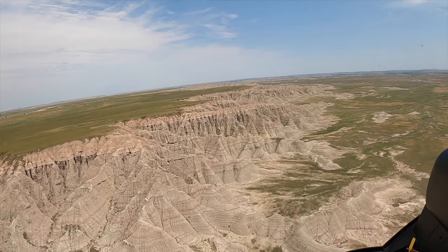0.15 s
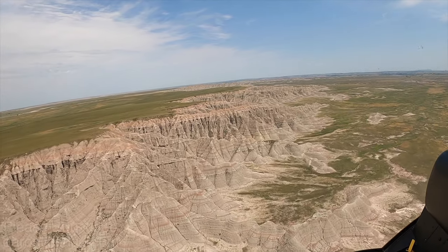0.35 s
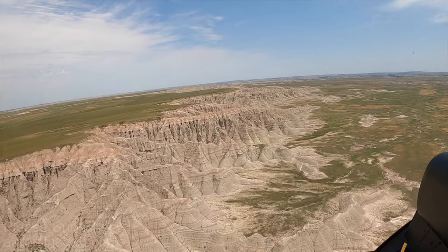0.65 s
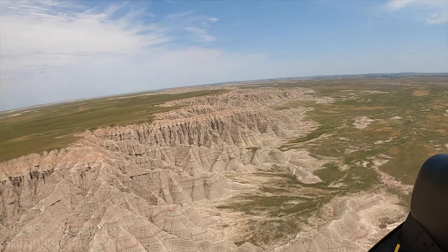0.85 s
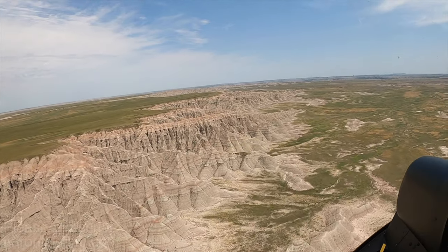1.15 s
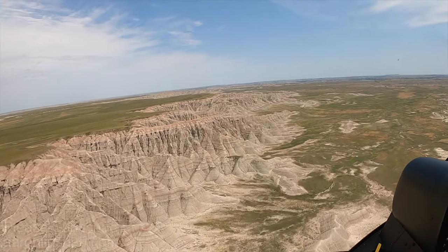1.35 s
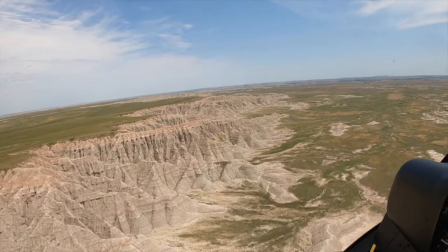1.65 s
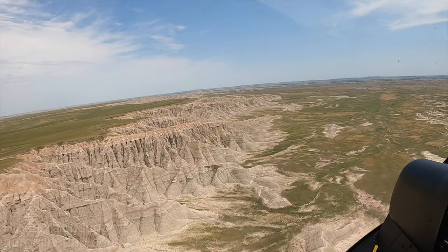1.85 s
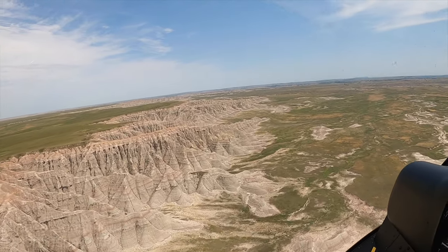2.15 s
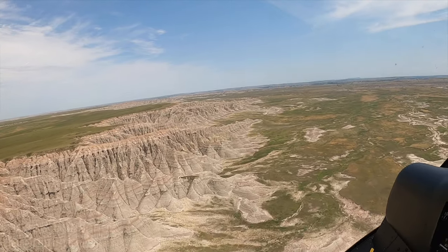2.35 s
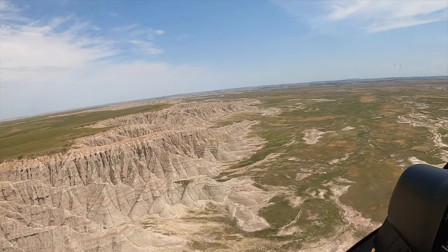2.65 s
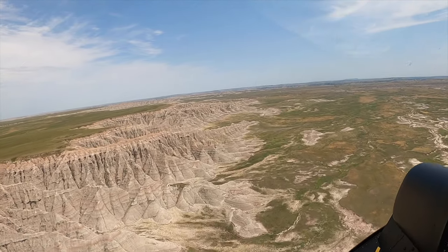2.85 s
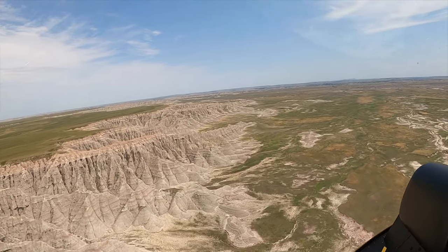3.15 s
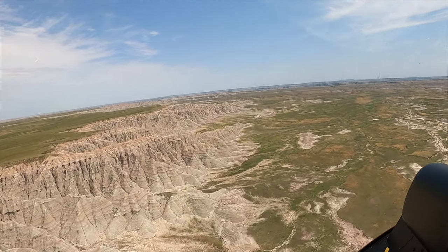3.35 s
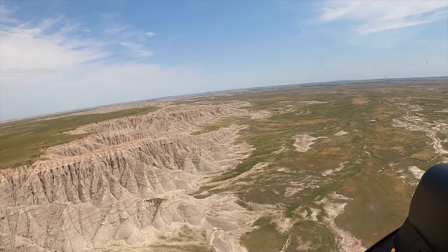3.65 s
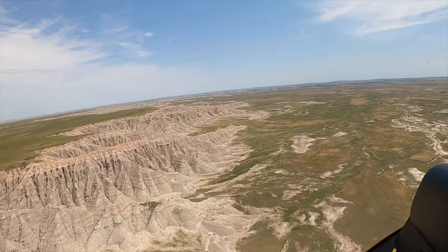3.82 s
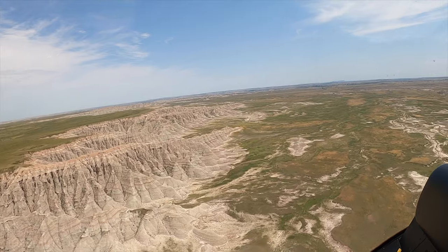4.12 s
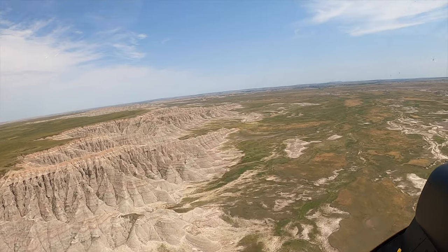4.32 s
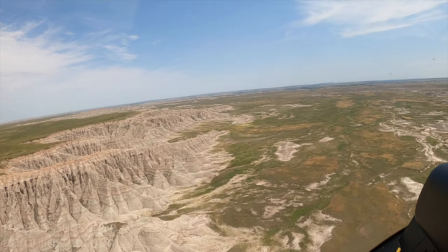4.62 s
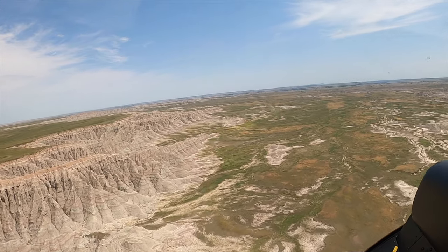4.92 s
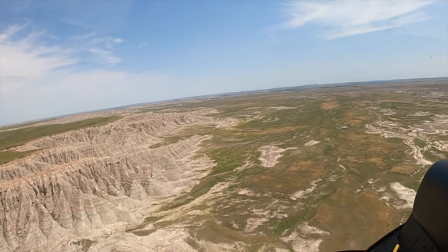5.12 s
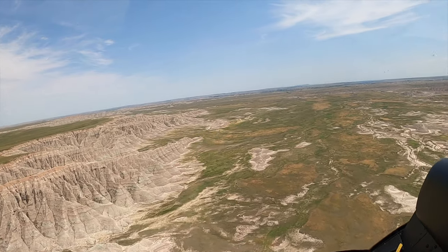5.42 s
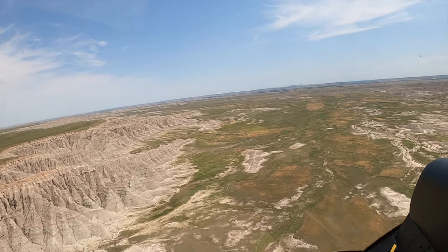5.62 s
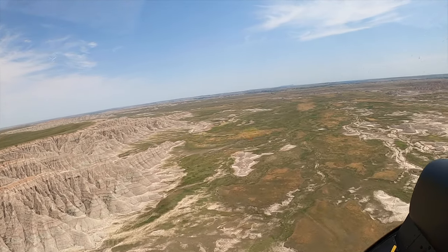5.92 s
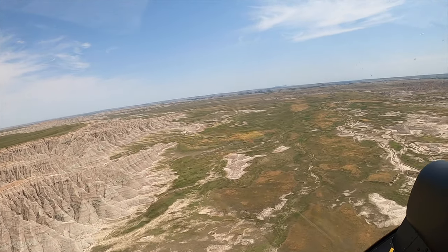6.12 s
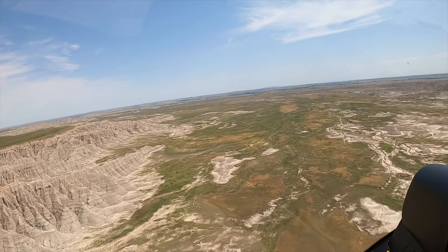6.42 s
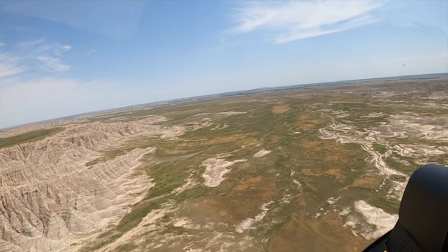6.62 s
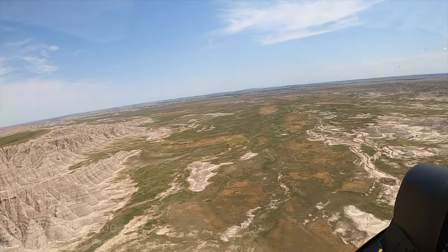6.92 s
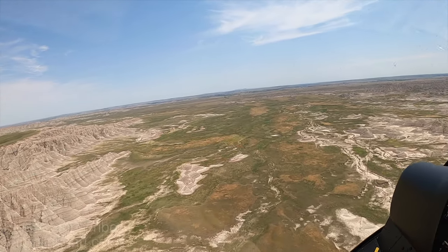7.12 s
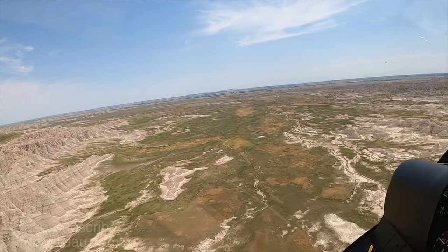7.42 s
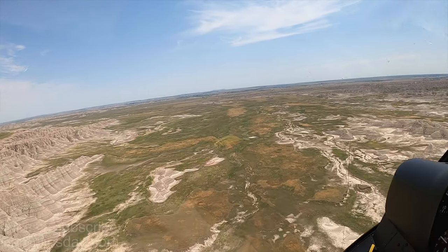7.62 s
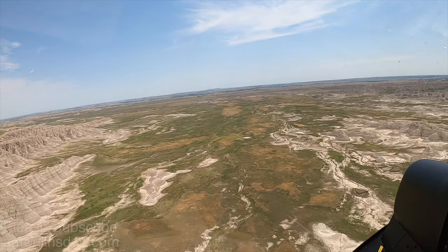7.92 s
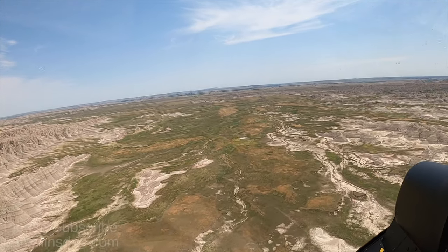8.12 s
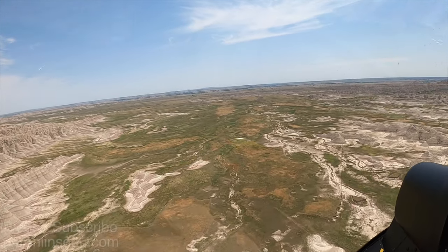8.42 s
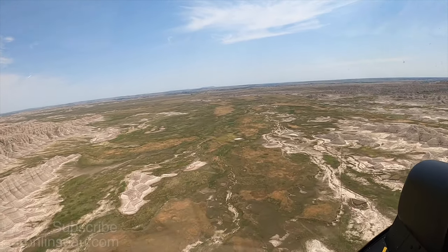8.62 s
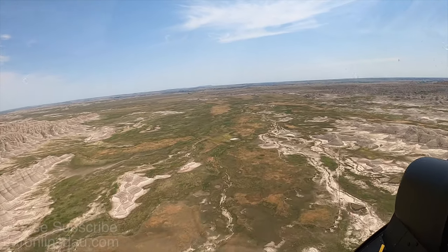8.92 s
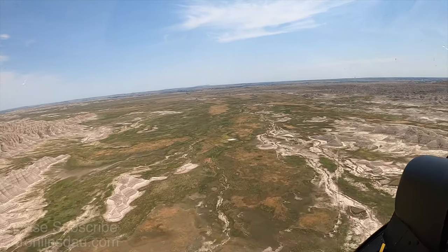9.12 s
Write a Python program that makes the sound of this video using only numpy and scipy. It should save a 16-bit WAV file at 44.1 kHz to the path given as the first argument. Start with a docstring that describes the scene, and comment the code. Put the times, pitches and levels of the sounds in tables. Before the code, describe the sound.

Inside a small helicopter cabin, a steady piston-engine hum and throbbing rotor roar on, with a few quick blade slaps at the start.

```python
"""A six-cylinder piston engine hums at its firing rate inside a small helicopter in steady cruise.
The two-blade main rotor throbs and the tail rotor buzzes, both as tones geared to the engine. Slipstream
roars through the cabin shell as coloured noise and hisses at the door seal with every blade passage.
At first the blades slap a few times; small ticks are scattered throughout, the first among the slaps.
Narrow-band noise makes a soft, breathy squeak near 1.5 to 1.9 kHz, and a fainter one earlier."""
import sys
import numpy as np
from scipy import signal
from scipy.fft import rfft, irfft, next_fast_len
from scipy.io import wavfile
from scipy.ndimage import uniform_filter1d, minimum_filter1d

SR = 44100
rng = np.random.default_rng(int(sys.argv[2]) if len(sys.argv) > 2 else 0)


def master_out(mix):
    """Clip the mix to full scale and print it as 16-bit PCM to the path in sys.argv[1]."""
    frames = np.transpose(np.atleast_2d(mix))
    ceiling = np.clip(frames, -1, 1)
    pcm = np.round(ceiling * 32767).astype(np.int16)
    wavfile.write(sys.argv[1], SR, pcm)


N = 408366
TIME = np.arange(N) / SR
FFT_SIZE = next_fast_len(N)
BINS_HZ = np.maximum(np.fft.rfftfreq(FFT_SIZE, 1 / SR), 1)
LEFT_LAG_S = 5.3e-5
CYLINDERS, FIRINGS_PER_MAIN_BLADE, FIRINGS_PER_TAIL_BLADE = 6, 10.076, 1.6925


def from_db(db):
    """Decibels to gain."""
    return 10 ** (np.asarray(db) / 20)


def in_time(rows):
    """Interpolate a curve of (seconds, value) at every sample."""
    seconds, values = np.transpose(rows)
    return np.interp(TIME, seconds, values)


def at_hz(points, hz):
    """Read a spectrum on a log-frequency axis."""
    known_hz, values = np.transpose(points)
    return np.interp(np.log(hz), np.log(known_hz), values)


def drift(rate_hz):
    """Slow random wander of spread about 1, with rate_hz knots per second."""
    knots = rng.standard_normal(int(N / SR * rate_hz) + 2)
    wander = np.interp(TIME * rate_hz, np.arange(len(knots)), knots)
    return wander * np.sqrt(3 / 2)  # restores the spread lost between knots


def sides(hz):
    """Left and right gain at a frequency."""
    # Balance between the microphone ports. Each row: frequency in Hz, left minus right in dB.
    balance = [(25, .4), (60, .1), (130, .55), (280, 1.1), (650, 2), (1300, .8), (2200, 3.5), (4000, 3.4),
               (5800, 0), (8000, -.7), (13000, -1.5)]
    return from_db(at_hz(balance, hz) * np.array([[.5], [-.5]]))


def air(colour):
    """Turbulence coloured by the cabin, partly alike at the two ports; rms 1 in their mean."""
    # Cabin resonances and hollows. Each row: centre in Hz, width in Hz, lift in dB.
    cabin = [(189.4, 30, -3), (209, 21, 2.5), (341, 18, -3), (426, 8.6, -2), (512, 22, -3.5),
             (654, 42, 2.5), (710, 35, -2.5), (769, 40, 3.8), (867, 26, -5), (896, 55, 2.5), (1124, 30, -4),
             (1143, 25, 4), (1750, 220, 0.5), (2087, 130, 2.5), (2500, 65, -3), (2540, 58, 2),
             (2720, 58, 1), (3180, 160, 1), (3683, 60, -5), (3725, 50, 5.5), (4830, 160, 2)]
    # Likeness between the ports. Each row: frequency in Hz, correlation 0 to 1.
    likeness = [(100, .997), (280, .965), (610, .86), (1320, .69), (2200, .71), (2870, .72), (4500, .25),
                (7000, .2), (12000, .3)]
    lift_db = sum(db / (1 + (2 * (BINS_HZ - hz) / width_hz) ** 2) for hz, width_hz, db in cabin)
    alike = np.clip(at_hz(likeness, BINS_HZ), 0, .999)
    mid, side = rfft(rng.standard_normal((2, FFT_SIZE)))
    ports = np.sqrt(1 + alike) * mid + np.sqrt(1 - alike) * side * [[1], [-1]]
    ports[0] *= np.exp(-2j * np.pi * BINS_HZ * LEFT_LAG_S)
    shape = sides(BINS_HZ) * from_db(at_hz(colour, BINS_HZ) + lift_db)
    noise = irfft(ports * shape, FFT_SIZE)[:, :N]
    return noise / noise.mean(axis=0).std()


def band_noise(low_hz, high_hz):
    """Noise in one band; rms 1."""
    band = signal.butter(3, [low_hz, high_hz], "band", fs=SR, output="sos")
    noise = signal.sosfilt(band, rng.standard_normal(N))
    return noise / noise.std()


def tone(turns, db, start_turns=0):
    """A sine that follows a shaft, at an rms level before port balance; it reaches the left port later."""
    mean_hz = turns[-1] / TIME[-1]
    lag_turns = np.array([[mean_hz * LEFT_LAG_S], [0]])
    wave = np.sqrt(2) * from_db(db) * np.exp(2j * np.pi * (turns + start_turns))
    return (sides(mean_hz) * np.exp(-2j * np.pi * lag_turns) * wave).real


def harmonics(turns, rows, waver_db, scatter_turns, waver_hz):
    """Tones of a repeating pulse, rows of (multiple, dB); the cabin scatters their phases and each wavers."""
    total = 0
    for multiple, db in rows:
        level_db = db + waver_db * drift(waver_hz)
        total = total + tone(multiple * turns, level_db, scatter_turns * rng.standard_normal())
    return total


def engine(firings, load_db):
    """A strong wavering firing tone; unequal cylinders add cycle multiples; both dip with rotor load."""
    # Engine tones. Each row: multiple of the four-stroke cycle rate, level in dB at zero load.
    cycle_tones = [(2, -31.5), (3, -31), (4, -33), (7, -35), (10, -40.5), (11, -37), (12, -34.5),
                   (13, -39.5), (14, -44.5), (16, -40.5), (17, -39), (18, -48.5), (19, -47.5), (20, -46),
                   (22, -46.5), (24, -52), (28, -51.5), (29, -51), (34, -48), (40, -52)]
    # Gearbox whine. Each row: multiple of the four-stroke cycle rate, level in dB.
    gears = [(85, -54.5)]
    hum_db = -14.5 - 0.16 * load_db + 0.67 * drift(7.7)
    hum = tone(firings, hum_db, start_turns=-0.33)
    cycles = firings / CYLINDERS
    jittered = cycles + 0.0059 * drift(12)
    whine = harmonics(jittered, gears, waver_db=0.5, scatter_turns=0.9, waver_hz=11)
    uneven = harmonics(cycles, cycle_tones, waver_db=0.76, scatter_turns=0.97, waver_hz=5)
    return hum + whine + from_db(-.4 * load_db) * uneven


def main_rotor(blades, load_db):
    """Blade pressure throbs in tones that swell and fade; the wake buffets the shell as load grows."""
    # Weaker rotor tones. Each row: multiple of the blade rate, level in dB.
    blade_tones = [(1, -34.5), (2, -44), (7, -46), (9, -44), (11, -40)]
    # Strongest tones, keyed by multiple of the blade rate. Each row: time in seconds, level in dB.
    swells = {3: [(0, -36), (.6, -29), (1.4, -29), (2.0, -38), (2.7, -31), (3.6, -28), (4.5, -31),
              (4.9, -39), (5.5, -34), (6.9, -33), (7.6, -38), (9.26, -29)], 4: [(0, -21.5), (.42, -20),
              (.55, -29), (1.1, -34), (2.0, -29), (3.0, -25.5), (4.3, -27), (4.7, -30), (5.3, -25),
              (6.6, -33), (8.0, -29), (8.6, -26), (9.26, -22.5)], 5: [(0, -32), (.4, -33), (.7, -28),
              (1.4, -25.5), (2.4, -30), (3.0, -26), (3.8, -25.5), (4.5, -33), (5.2, -26.5), (5.8, -24.5),
              (6.2, -29), (7.6, -23.5), (8.5, -32), (9.26, -26)]}
    # Wake spectrum. Each row: frequency in Hz, relative density in dB per Hz.
    buffet_colour = [(8, -18.5), (20, -4), (30, -3), (50, 2), (80, -2), (110, -17), (200, -41.5),
                     (1500, -130)]
    peak_at = 0.252  # fraction of a blade passage
    throb = harmonics(blades + 0.12, blade_tones, waver_db=3.5, scatter_turns=0.24, waver_hz=2.9)
    for multiple, swell in swells.items():
        throb = throb + tone(multiple * (blades - peak_at), in_time(swell))
    return throb + from_db(-29.5 + 0.36 * load_db) * air(buffet_colour)


def tail_rotor(firings):
    """The tail rotor's faster blade passages buzz in a few wavering harmonics."""
    # Each row: multiple of the tail blade rate, level in dB.
    tail_tones = [(1, -28), (2, -32.5), (3, -34), (4, -39.5)]
    blades = firings / FIRINGS_PER_TAIL_BLADE
    return harmonics(blades, tail_tones, waver_db=1.5, scatter_turns=0.29, waver_hz=4)


def blade_slaps(dull_hz, echo_s, echo_db, swell_db, rise_s, decay_s, low_hz, high_hz):
    """A blade cutting a tip vortex knocks on the cabin; a reflection repeats it, in a dull swell of air."""
    # Each row: start in seconds, slap strength in dB.
    slaps = [(.002, -18), (.0756, -13.5), (0.1489, -13), (.2216, -15), (.296, -25), (.3682, -16)]
    # Cabin ringing under a slap. Each row: frequency in Hz, relative level in dB, t60 in seconds.
    modes = [(470, -4.5, 0.026), (650, 0, .028), (900, -6, 0.018), (1160, -13, 0.016)]
    knocks, swells = 0, 0
    for s, db in slaps:
        for at_s, level_db in ((s, db), (s + echo_s, db + echo_db)):
            age_s = np.maximum(TIME[:SR] - at_s, 0)  # all slaps fall in the first second
            for hz, mode_db, t60_s in modes:
                decay = from_db(level_db + mode_db - 60 * age_s / t60_s)
                knocks = knocks - decay * np.sin(2 * np.pi * hz * age_s)
        swells = swells + from_db(db) * np.exp(np.minimum((TIME - s) / rise_s, (s - TIME) / decay_s))
    knocks = signal.sosfilt(signal.butter(4, dull_hz, fs=SR, output="sos"), knocks)
    return np.pad(knocks, (0, N - SR)) + from_db(swell_db) * swells * band_noise(low_hz, high_hz)


def low_roar():
    """Low turbulence through the cabin shell, surging about its mean level."""
    # Surges. Each row: time in seconds, level in dB, used relative to the mean.
    surges = [(0, -20), (.12, -26.5), (.3, -21), (1.0, -22.5), (1.35, -20.5), (1.6, -22.3), (1.82, -20.5),
              (2.1, -24.5), (2.52, -19), (2.75, -22.5), (2.95, -20.8), (3.3, -24), (3.8, -23), (4.05, -26),
              (4.3, -22), (4.77, -21.5), (5.75, -23), (6.0, -23.5), (6.23, -25), (6.55, -22), (7.3, -22.5),
              (8.4, -22.5), (9.26, -21)]
    # Each row: frequency in Hz, relative density in dB per Hz.
    roar_colour = [(50, -28.5), (100, -3.5), (150, 3), (190, -1), (230, -0.5), (300, -2.5), (400, -6),
                   (520, -11), (700, -22), (1400, -48.5), (12000, -130)]
    surge_db = in_time(surges)
    return from_db(-21 + .9 * (surge_db - surge_db.mean())) * air(roar_colour)


def air_rush(flow_db):
    """Mid-band turbulence that rises and falls dB for dB with the airflow."""
    # Each row: frequency in Hz, relative density in dB per Hz.
    rush_colour = [(200, -20), (400, -6), (520, 1), (700, 0.5), (1100, 0.1), (1400, -8), (1800, -18.5),
                   (3000, -33), (12000, -87.5)]
    return from_db(-28.5 + flow_db) * air(rush_colour)


def slipstream(flow_db):
    """Brighter turbulence that follows the airflow and flutters slightly."""
    # Each row: frequency in Hz, relative density in dB per Hz.
    stream_colour = [(600, -22), (1400, -1.5), (1800, -3), (2100, 0.5), (2450, 0), (3100, -1), (3900, -5),
                     (4400, -9), (5200, -10.5), (7000, -18.5), (9000, -23.5), (11000, -33.5),
                     (12500, -35.5), (14000, -52.5)]
    return from_db(-33.5 + 1.05 * flow_db + 0.42 * drift(14)) * air(stream_colour)


def door_seal(blades, flow_db, peak_at, sharpness, leak, flutter_db, sputter_db):
    """A steady leak of hiss; each blade's downwash squeezes a sputtering puff past the seal."""
    # Each row: frequency in Hz, relative density in dB per Hz.
    seal_colour = [(3000, -16), (4500, -3), (5400, -2), (6300, 0.5), (7600, -1), (9000, -9), (10800, -15),
                   (12400, -10.5), (13200, -18.5), (14000, -28)]
    puff = leak + np.exp(sharpness * (np.cos(2 * np.pi * (blades - peak_at)) - 1))
    waver_db = flutter_db * drift(11) + sputter_db * drift(400)
    return from_db(-49 + 1.2 * flow_db + waver_db) * puff * air(seal_colour)


def spits(decay_s, low_hz, high_hz):
    """The seal now and then lets go with a tiny tick: decaying noise, independent at each port."""
    # Each row: start in seconds, level in dB before a common 2 dB lift.
    ticks = [(0.3091, -46), (0.4533, -45.5), (2.9022, -46), (3.2733, -46), (3.4145, -46), (3.7099, -41),
             (3.9299, -40), (4.3, -44), (7.6175, -45), (9.017, -45)]
    envelope = sum(from_db(db + 2) * (TIME >= s) * np.exp(-np.abs(TIME - s) / decay_s) for s, db in ticks)
    return envelope * np.array([band_noise(low_hz, high_hz), band_noise(low_hz, high_hz)])


def breathy_squeaks(spread_hz):
    """A soft, breathy squeak of overlapping narrow noise bursts, and a fainter single burst earlier."""
    # Each row: peak time in seconds, peak rms level in dB, Gaussian half length in seconds, centre in Hz.
    bursts = [(4.9, -40, 0.054, 1780), (6.34, -40, 0.02, 1500), (6.41, -36, 0.017, 1880),
              (6.43, -38, 0.018, 1610)]
    total = 0
    for s, db, half_s, hz in bursts:
        envelope = from_db(db) * np.exp(-.5 * ((TIME - s) / half_s) ** 2)
        total = total + envelope * band_noise(hz - spread_hz, hz + spread_hz)
    return total


def limiter(x, limit_db, release_db_per_s, size):
    """Peaks over the limit turn the gain down; it recovers at a steady rate, smoothed over size samples."""
    peak_db = 20 * np.log10(np.abs(x).max(axis=0) + 1e-9)
    over_db = np.maximum(peak_db - limit_db, 0)
    release_db = release_db_per_s * TIME
    cut_db = np.maximum.accumulate(over_db + release_db) - release_db
    return x * from_db(uniform_filter1d(minimum_filter1d(-cut_db, size), size))


def scene():
    """Engine and rotors are geared together; one airflow drives the rush, slipstream and seal hiss."""
    # Engine speed. Each row: time in seconds, cylinder firings per second.
    firing_hz = [(0.0, 137.2), (0.35, 137.95), (0.8, 136.5), (1.3, 135.35), (1.7, 135.55), (2.2, 135.95),
                 (2.8, 135.95), (3.3, 136.5), (3.7, 136.95), (4.4, 136.75), (5.1, 136.4), (6.0, 136.8),
                 (6.9, 136.15), (8.2, 136.6), (8.7, 136.5), (9.26, 137.2)]
    # Main rotor load. Each row: time in seconds, blade load in dB above cruise.
    load = [(0, 4), (.42, 13), (.55, 5), (1.1, -1.5), (1.7, -1.5), (2.3, -4), (3.0, 5), (4.35, -2.5),
            (4.62, 2), (5.0, -8), (5.4, 1.5), (6.0, 1), (6.5, -1), (7.5, -4), (7.8, 0), (8.25, -2.5),
            (8.7, 0), (9.15, 8)]
    # Air past the cabin. Each row: time in seconds, flow in dB above cruise.
    airflow = [(0, 0.8), (.13, -4), (.25, 0), (.9, 0.2), (2.0, 0.6), (2.7, .5), (3.25, 1.4), (3.8, -0.1),
               (5.0, 0.3), (5.5, -0.8), (6.3, 0), (6.7, -1), (7.2, -.2), (7.7, -1.6), (8.1, -0.2),
               (9.26, -0.9)]
    firings = np.cumsum(in_time(firing_hz)) / SR
    blades = firings / FIRINGS_PER_MAIN_BLADE
    load_db, flow_db = in_time(load), in_time(airflow)
    rotors = main_rotor(blades, load_db) + tail_rotor(firings)
    slaps = blade_slaps(dull_hz=1300, echo_s=.0043, echo_db=-2, swell_db=-13,
                        rise_s=0.005, decay_s=0.008, low_hz=420, high_hz=1000)
    wind = low_roar() + air_rush(flow_db) + slipstream(flow_db)
    hiss = door_seal(blades, flow_db, peak_at=0.25, sharpness=1.6, leak=.22, flutter_db=1.0, sputter_db=1.4)
    ticks = spits(decay_s=.0015, low_hz=6000, high_hz=12000)
    squeaks = breathy_squeaks(spread_hz=190)
    return engine(firings, load_db) + rotors + slaps + wind + hiss + ticks + squeaks


def record(dry):
    """The highest peaks are held down and the top is cut steeply at 14.1 kHz."""
    held = limiter(dry, limit_db=-3.5, release_db_per_s=32.5, size=220)
    return signal.sosfilt(signal.ellip(10, .1, 80, 14100, fs=SR, output="sos"), held)


dry = scene()
out = record(dry)
master_out(out)
```